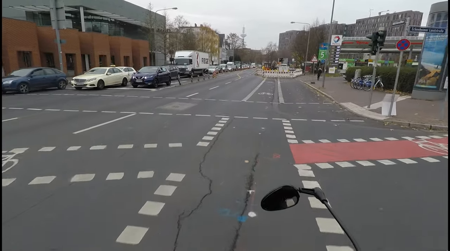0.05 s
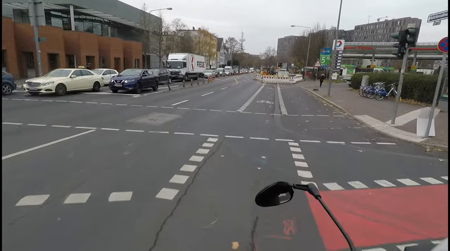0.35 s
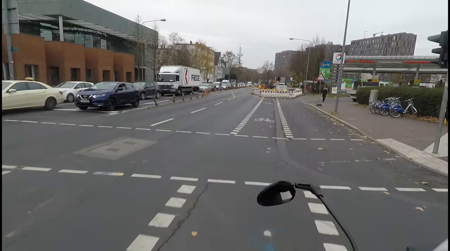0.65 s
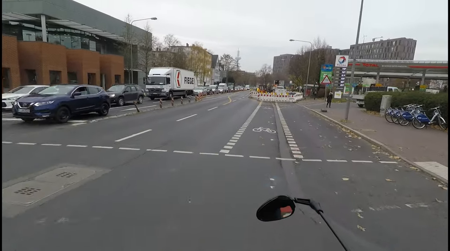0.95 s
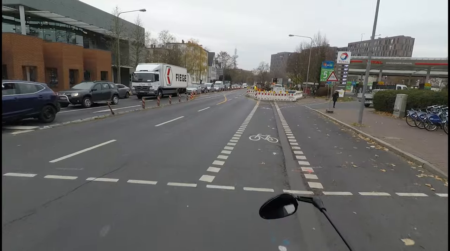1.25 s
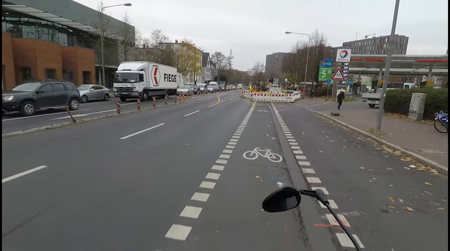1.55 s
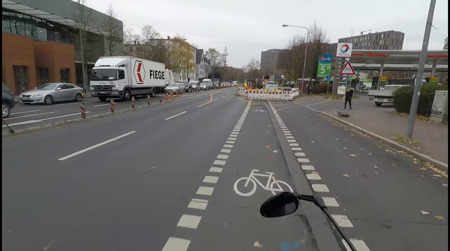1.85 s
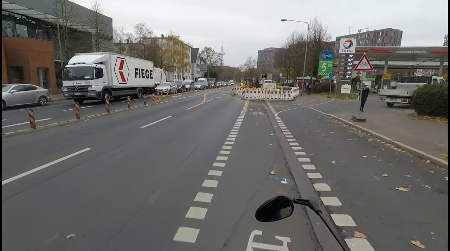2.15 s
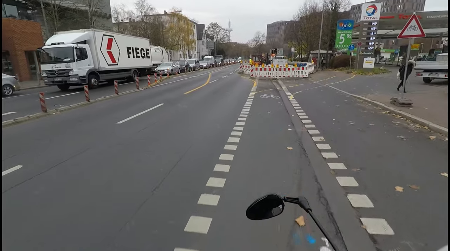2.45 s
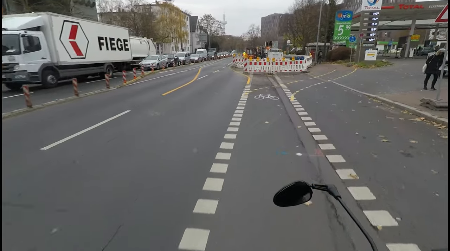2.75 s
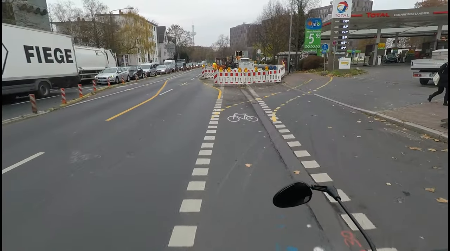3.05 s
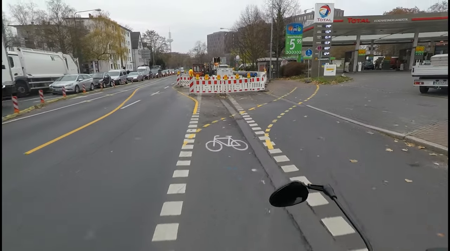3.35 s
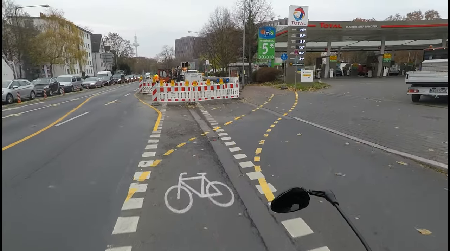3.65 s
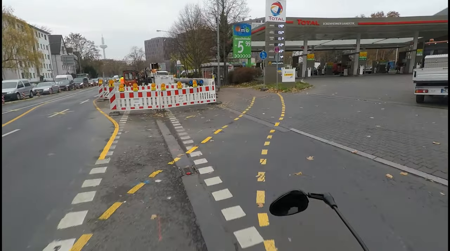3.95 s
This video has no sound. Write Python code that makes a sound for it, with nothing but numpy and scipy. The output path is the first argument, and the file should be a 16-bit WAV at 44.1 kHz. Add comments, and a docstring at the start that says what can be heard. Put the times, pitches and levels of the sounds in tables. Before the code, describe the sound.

Wind rumbles on a moving bicycle's microphone throughout, with puffing gusts around 0.5, 2 and 3.1 to 3.7 seconds. Behind it, engines and tyre hiss swell and fade along the street, with scattered light rattles and faint squeaks just before 2 seconds. From about 2.2 seconds a passing lorry adds fast, high, scratchy chirping, strongest around 3.2 seconds and quickening to the end.

```python
"""Wind rumbles on the microphone of a bicycle riding along a busy street, past oncoming traffic.
The moving air breaks into gusts, and single swirls hit the microphone as short puffs.
Behind it engines roar, tyres hiss as cars go by, and a lorry passes with a fast chirping,
probably its belt. There are brief squeaks, light rattles and the far hiss of the street.
A limiter turns everything down for a moment on the loudest peaks."""
import sys
import numpy as np
from scipy import signal
from scipy.fft import rfft, irfft
from scipy.io import wavfile
from scipy.ndimage import uniform_filter1d, minimum_filter1d

SR = 44100
rng = np.random.default_rng(int(sys.argv[2]) if len(sys.argv) > 2 else 0)


def waveform_to_disk(signal):
    """Save audio, clipped to [-1, 1], as 16-bit WAV at the path in sys.argv[1]."""
    frames = np.transpose(np.atleast_2d(signal))
    scaled = np.clip(frames, -1, 1) * 32767
    samples = np.round(scaled).astype(np.int16)
    wavfile.write(sys.argv[1], SR, samples)


N = 176400
TIME = np.arange(N) / SR

# How the wind's slow heaving, rumble, higher drumming and gusts rise and fall.
# Each row: time in seconds, relative level in dB.
HEAVE_LEVEL = [(0.0, -26), (0.59, -19.5), (1.45, -26.5), (1.49, -21.5), (2.51, -20.5), (2.57, -37.5),
               (2.63, -17), (2.8, -39), (2.83, -22), (2.96, -34), (3.04, -16.5), (3.14, -22), (3.92, -15.5),
               (4.0, -20)]
RUMBLE_LEVEL = [(0.0, -19.5), (0.1, -19), (0.3, -23.5), (0.47, -10.5), (0.53, -28.5), (0.59, -15.5),
                (0.66, -14.5), (0.69, -15), (0.96, -19), (1.73, -18), (1.74, -21.5), (2.17, -12.5),
                (2.27, -23), (2.32, -15), (2.34, -23.5), (2.85, -25.5), (3.11, -15.5), (3.14, -24),
                (3.27, -12.5), (3.56, -16), (3.59, -8.5), (3.7, -19.5), (3.74, -22.5), (4.0, -14.5)]
DRUMMING_LEVEL = [(0.0, -14.5), (0.23, -20), (0.44, -12), (0.56, -26.5), (0.66, -12), (0.93, -23.5),
                  (1.02, -15), (1.08, -29.5), (1.17, -15), (1.69, -19.5), (1.71, -12.5), (1.75, -25),
                  (1.84, -12), (1.92, -21.5), (1.97, -11.5), (2.29, -14), (2.48, -23.5), (3.04, -23),
                  (3.25, -17), (3.29, -30.5), (3.56, -13.5), (3.63, -27.5), (3.69, -22), (3.73, -34.5),
                  (3.87, -26.5), (4.0, -18)]
GUST_LEVEL = [(0, -34), (.35, -27), (.42, -16), (.475, -9.5), (.5, -19.5), (.62, -21), (.68, -10.5),
              (.79, -15.5), (.85, -23), (.9, -31), (1.08, -35), (1.45, -32), (1.7, -24), (1.77, -26.5),
              (1.94, -24.5), (1.98, -18), (2.09, -14.5), (2.125, -21), (2.16, -14), (2.26, -19.5),
              (2.33, -26.5), (2.5, -27.5), (3.0, -33), (3.1, -20.5), (3.2, -23), (3.26, -18.5),
              (3.42, -15.5), (3.5, -19.5), (3.69, -37.5), (3.74, -38), (3.9, -24), (4, -26.5)]
# How deep or bright each of them is. Each row: frequency in Hz, relative level in dB.
HEAVE_TONE = [(15, -8), (25, -1), (38, -1), (50, -5.5), (75, -13), (120, -43.5)]
RUMBLE_TONE = [(35, -23.5), (52, 4.5), (70, 1), (95, 1), (140, -18), (300, -40.5)]
DRUMMING_TONE = [(70, -20.5), (100, -4.5), (122, -1.5), (165, -8), (230, -14), (400, -29.5), (900, -48)]
GUST_TONE = [(90, -6), (160, 0), (280, 1), (470, -4), (800, -10), (1300, -19), (2000, -30), (3200, -41),
             (5000, -66)]
# Swirls of air hitting the microphone. Each row: middle in seconds, fade time in seconds,
# relative level in dB, top frequency in Hz.
PUFFS = [(.005, 0.014, -9.5, 890), (0.057, 0.013, -15.5, 513), (0.112, 0.031, -15, 485),
         (0.412, 0.0043, -4, 1300), (0.43, 0.0079, -11, 900), (0.463, 0.0045, -9, 900),
         (.484, 0.0025, -6, 2900), (0.608, 0.0089, -13, 1480), (0.633, 0.0028, -10, 1190),
         (0.742, 0.0039, -11, 1190), (0.759, 0.0067, -12.5, 1700), (0.804, 0.003, -13, 1990),
         (0.827, 0.0054, -17, 1820), (0.86, 0.016, -10.5, 444), (1.243, 0.012, -11.5, 570),
         (1.529, 0.011, -10, 730), (1.601, .014, -17.5, 805), (1.842, 0.0062, -10.5, 750),
         (1.964, 0.006, -12, 1400), (1.978, 0.0064, -9, 1200), (2.005, 0.0074, -3.5, 980),
         (2.028, .008, -7, 900), (2.054, 0.0051, -12.5, 1600), (2.15, .014, -15.5, 1420),
         (2.182, 0.0054, -12, 1350), (2.24, 0.037, -14.5, 594), (3.1, 0.02, -11, 620),
         (3.155, 0.0026, -10, 450), (3.234, 0.0087, -5, 670), (3.258, .006, -9.5, 1420),
         (3.272, 0.008, -7.5, 1630), (3.291, .01, -11, 1260), (3.328, 0.0074, -7.5, 805),
         (3.352, 0.0027, -9, 1510), (3.365, 0.0056, -12, 520), (3.408, 0.01, -13, 730),
         (3.523, 0.014, -13, 700), (3.554, 0.009, -11.5, 890), (3.593, 0.0098, -9, 850),
         (3.622, 0.0076, -8.5, 900), (3.657, 0.013, -13.5, 860), (3.692, 0.0093, -12.5, 600),
         (3.937, 0.0036, -12.5, 610), (3.997, 0.016, -17.5, 1090)]
# A gust tearing off. Each row: time in seconds, level in dB, middle frequency in Hz.
SWISH_PATH = [(3.685, -31, 445.4), (3.701, -15, 733), (3.712, -30, 860), (3.722, -21.5, 962),
              (3.735, -50, 1200), (3.78, -46, 1404)]

# How the traffic's roar and tyre hiss rise and fall. Each row: time in seconds, relative level in dB.
ROAR_LEVEL = [(0, -27), (.2, -24.5), (.6, -26.5), (.95, -32.5), (1.15, -33.5), (1.4, -28.5), (1.9, -26.5),
              (2.3, -34), (2.65, -31), (2.8, -29.5), (3.1, -22), (3.3, -27.5), (3.55, -27.5), (4, -37.5)]
TYRE_LEVEL = [(0.0, -35), (0.12, -35.5), (0.33, -35), (0.48, -32.5), (0.51, -39), (0.72, -41.5),
              (0.99, -48), (1.29, -40.5), (1.94, -33.5), (2.05, -39.5), (2.41, -44), (2.88, -38),
              (3.07, -35), (3.32, -35), (3.34, -40.5), (3.96, -44.5), (4.0, -31)]
# The tone of the roar, the tyres and the far street. Each row: frequency in Hz, relative level in dB.
ROAR_TONE = [(100, -6), (250, 1), (500, -7.5), (750, -8), (1000, -5.5), (1500, -7), (2000, -17),
             (3000, -31.5)]
TYRE_TONE = [(900, -19), (1500, -6), (1800, -2), (2400, -4), (3600, -7.5), (4400, -11.5), (5000, -16),
             (6500, -19.5), (7600, -32), (10000, -27), (12000, -29)]
STREET_TONE = [(2000, -0.5), (4500, 0.5), (6500, -5.5), (7700, -15), (10000, -15.5), (12000, -36)]

# How fast the lorry chirps. Each row: time in seconds, chirps per second.
CHIRP_SPEED = [(2.2, 24.6), (2.7, 26), (3.1, 27), (3.6, 29.2), (4, 34)]
# How loud it chirps. Each row: time in seconds, relative level in dB.
CHIRP_LOUDNESS = [(2.23, -43.5), (2.4, -48), (2.62, -46.5), (2.72, -40.5), (2.79, -47), (2.82, -38),
                  (2.87, -44), (2.94, -37.5), (3.05, -42.5), (3.13, -33.5), (3.2, -41), (3.23, -33),
                  (3.31, -34.5), (3.34, -46), (3.44, -39), (3.49, -44), (3.58, -41.5), (3.65, -44.5),
                  (4, -43.5)]
# Its base pitch, sinking as it goes by. Each row: time in seconds, pitch in Hz.
CHIRP_BASE_PITCH = [(2.2, 5960), (3.1, 5950), (3.5, 5850), (3.8, 5740), (4, 5700)]
# The bands that ring in a chirp. Each row: share of the base pitch, half width in Hz, relative level in dB.
CHIRP_BANDS = [(0.99, 150, -4), (.885, 480, -4.5), (0.84, 1400, -14)]
# Squeaks in the traffic. Each row: middle in seconds, fade time in seconds, pitch in Hz, level in dB.
BRIEF_SQUEAKS = [(0.453, 0.007, 3680, -30), (.61, 0.041, 5220, -50), (1.053, 0.045, 5200, -53),
                 (1.116, 0.033, 5100, -52), (1.17, 0.023, 4400, -48), (1.77, 0.016, 4520, -40),
                 (1.81, 0.023, 5270, -42), (1.848, 0.014, 5120, -39), (1.891, 0.019, 5170, -40.5),
                 (1.922, 0.013, 4880, -38)]
# Light rattles. Each row: start in seconds, level in dB, middle frequency in Hz.
RATTLES = [(.098, -35, 3800), (0.322, -39, 4500), (.434, -29, 3300), (1.332, -38, 3300),
           (2.016, -38, 10600), (3.052, -30, 3000), (3.357, -46.5, 9000), (3.398, -36, 3800),
           (3.587, -35, 4300), (3.746, -30, 1500), (3.799, -27.5, 1640), (3.864, -29.5, 1990)]


def airstream():
    """Air flowing over the microphone makes it heave, rumble and drum."""
    heave = level_curve(HEAVE_LEVEL, boost_db=1.5) * steady(shaped_noise(HEAVE_TONE), window_s=0.15)
    rumble = level_curve(RUMBLE_LEVEL, boost_db=1) * steady(shaped_noise(RUMBLE_TONE), window_s=0.045)
    drum = level_curve(DRUMMING_LEVEL, boost_db=-2) * steady(shaped_noise(DRUMMING_TONE), window_s=0.06)
    return heave + rumble + drum


def gusts(pressure, follow_share=0.2):
    """Churning air flutters and flares up on the peaks of the deep pressure swings."""
    peaks = np.abs(steady(pressure, window_s=0.019))
    flare = unit_level(1 - follow_share + follow_share * peaks)
    churn = shaped_noise(GUST_TONE) * flare * flicker(depth_db=2.5, speed_hz=68)
    return level_curve(GUST_LEVEL, boost_db=-2) * steady(churn, window_s=0.044)


def puffs(usual_top_hz=890, usual_body_hz=(140, 410), boost_db=-3):
    """Each swirl of air hits as a short puff with a deep body; small fast ones sit higher and crack."""
    out, reach = np.zeros(N), SR // 8
    for middle_s, fade_s, db, top_hz in PUFFS:
        middle = int(middle_s * SR)
        span = slice(max(middle - reach, 0), min(middle + reach, N))
        body_hz = np.array(usual_body_hz) * (top_hz / usual_top_hz) ** 0.51   # rises less than the top
        body = signal.butter(1, body_hz, "band", fs=SR, output="sos")
        top_cut = signal.butter(6, top_hz, fs=SR, output="sos")
        noise = signal.sosfilt(np.vstack([body, top_cut]), rng.standard_normal(2 * reach))
        puff = steady(noise, window_s=fade_s)
        bell = swell(middle_s, fade_s)[span]
        out[span] += from_db(db + boost_db) * bell * puff[-len(bell):]
    return out


def swish():
    """A late gust tears off in a hollow, rising rush of air."""
    db, hz = curves(SWISH_PATH)
    sounding = (TIME > SWISH_PATH[0][0]) & (TIME < SWISH_PATH[-1][0])
    return from_db(db) * steady(ringing_noise(hz, half_width_hz=340), window_s=0.01) * sounding


def traffic():
    """Engines and road roar, with the hiss of the nearest tyres on top."""
    roar = shaped_noise(ROAR_TONE) * flicker(depth_db=1.2, speed_hz=16)
    hiss = shaped_noise(TYRE_TONE) * flicker(depth_db=1.27, speed_hz=29)
    return level_curve(ROAR_LEVEL, boost_db=-5) * roar + level_curve(TYRE_LEVEL, boost_db=0.5) * hiss


def lorry_chirps(start_s=2.222, rise_s=0.0011, hold_s=0.019, fade_s=0.007, spread_db=1.0):
    """One scratchy chirp for each turn, probably of a belt, quickening as the engine picks up."""
    rate, = curves(CHIRP_SPEED)
    turns = np.cumsum(rate * (TIME > start_s)) / SR
    age_s = turns % 1 / rate   # time since this chirp began
    strength = from_db(spread_db * rng.standard_normal(200))[turns.astype(int)]
    rise = 1 - np.exp(-age_s / rise_s)
    fall = np.exp(-np.maximum(age_s - hold_s, 0) / fade_s)
    pitch, = curves(CHIRP_BASE_PITCH)
    ring = sum(from_db(db) * ringing_noise(share * pitch, half_width_hz)
               for share, half_width_hz, db in CHIRP_BANDS)
    return level_curve(CHIRP_LOUDNESS) * strength * rise * fall * steady(ring, window_s=0.015)


def squeaks():
    """Thin, rough squeaks come from the traffic."""
    return sum(from_db(db) * swell(middle_s, fade_s) * ringing_noise(hz, half_width_hz=180)
               for middle_s, fade_s, hz, db in BRIEF_SQUEAKS)


def rattles(fade_s=0.009, band_ratio=1.23):
    """Small dry rattles, probably from the bicycle, die away at once."""
    out = np.zeros(N)
    for start_s, db, hz in RATTLES:
        fall = (TIME >= start_s) * np.exp(-np.minimum(np.abs(TIME - start_s) / fade_s, 20))
        out += from_db(db) * fall * filtered_noise([hz / band_ratio, hz * band_ratio], "band")
    return out


def far_street(level_db=-50.5):
    """The far street gives a faint, steady hiss."""
    return from_db(level_db) * shaped_noise(STREET_TONE)


def from_db(db):
    """Turn decibels into a number to multiply a sound by."""
    return 10 ** (np.asarray(db) / 20)


def unit_level(x):
    """Scale a sound so that its average power is 1."""
    return x / np.sqrt(np.mean(x ** 2) + 1e-20)


def curves(rows):
    """Join a table's points in time with straight lines, one curve for each column after the first."""
    times, *columns = np.transpose(rows)
    return [np.interp(TIME, times, column) for column in columns]


def level_curve(rows, boost_db=0):
    """Turn a table of levels into a changing volume, shifted up or down by boost_db."""
    return from_db(curves(rows)[0] + boost_db)


def filtered_noise(edges_hz, kind):
    """Noise with only its low part or one band kept; the filter gets half a second to settle."""
    sos = signal.butter(2, edges_hz, kind, fs=SR, output="sos")
    return unit_level(signal.sosfilt(sos, rng.standard_normal(N + SR // 2))[-N:])


def shaped_noise(tone):
    """Noise that follows a tone table and drops 30 dB an octave beyond its ends."""
    hz, db = np.transpose(tone)
    octaves = np.log2(np.maximum(np.fft.rfftfreq(N, 1 / SR), 1))
    listed = np.log2(hz)
    beyond = np.abs(octaves - np.clip(octaves, listed[0], listed[-1]))
    gain = from_db(np.interp(octaves, listed, db) - 30 * beyond)
    return unit_level(irfft(rfft(rng.standard_normal(N)) * gain, N))


def ringing_noise(hz, half_width_hz):
    """A narrow band of noise that sounds like a rough note; its pitch may move."""
    phase = 2 * np.pi * np.cumsum(hz * np.ones(N)) / SR
    return sum(filtered_noise(half_width_hz, "low") * wave(phase) for wave in (np.cos, np.sin))


def flicker(depth_db, speed_hz):
    """A volume that wavers at random."""
    return unit_level(from_db(depth_db * filtered_noise(speed_hz, "low")))


def steady(x, window_s):
    """Even out the chance swings in a noise's loudness."""
    size = int(window_s * SR)
    power = uniform_filter1d(uniform_filter1d(x ** 2, size), size)
    return unit_level(x / np.sqrt(power + 1e-9))


def swell(middle_s, fade_s):
    """A volume that rises and falls in a bell shape."""
    return np.exp(-np.minimum(2 * ((TIME - middle_s) / fade_s) ** 2, 20))


def scene():
    """Wind on the microphone over the sounds of the street, in one channel."""
    pressure = airstream()
    wind = pressure + gusts(pressure) + puffs() + swish()
    street = traffic() + lorry_chirps() + squeaks() + far_street()
    return (wind + street + rattles())[None]


def record(dry):
    """A fast limiter turns everything down under the strongest gusts; the highest treble is cut."""
    limit, attack_s, recovery_db_per_s, cutoff_hz = 0.9, 0.002, 96.5, 7450
    over_db = 20 * np.log10(np.maximum(np.abs(dry[0]) / limit, 1))
    recovery_db = recovery_db_per_s * TIME
    dip_db = np.maximum.accumulate(over_db + recovery_db) - recovery_db   # eases off after each peak
    size = int(attack_s * SR)
    gain_db = minimum_filter1d(-dip_db, 2 * size)   # start each dip just before its peak
    smooth_db = uniform_filter1d(uniform_filter1d(gain_db, size), size)
    end_fades = np.clip(np.minimum(TIME, TIME[-1] - TIME) / 0.003, 0, 1)
    treble_cut = signal.butter(5, cutoff_hz, fs=SR, output="sos")
    return signal.sosfilt(treble_cut, dry * from_db(smooth_db) * end_fades)


dry = scene()
out = record(dry)
waveform_to_disk(out)
```